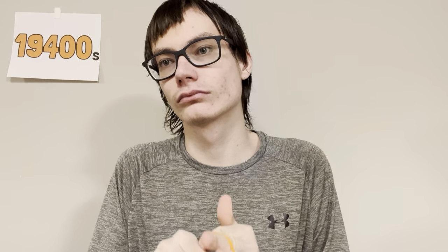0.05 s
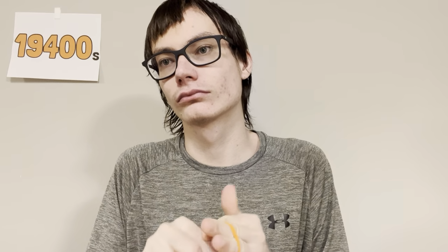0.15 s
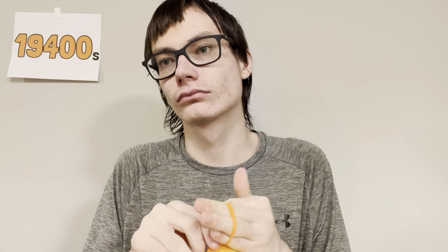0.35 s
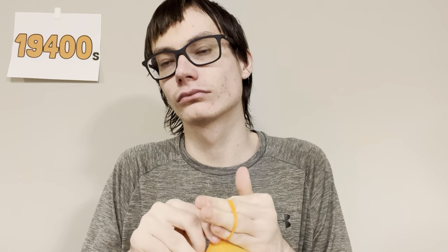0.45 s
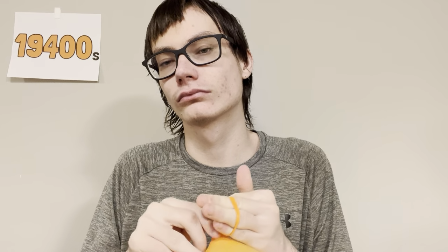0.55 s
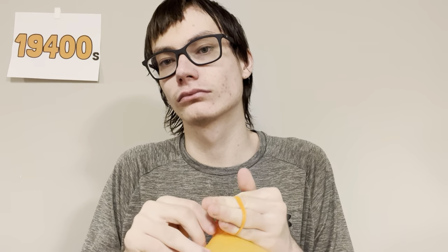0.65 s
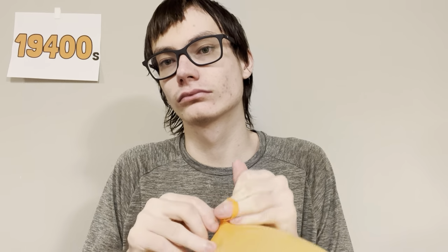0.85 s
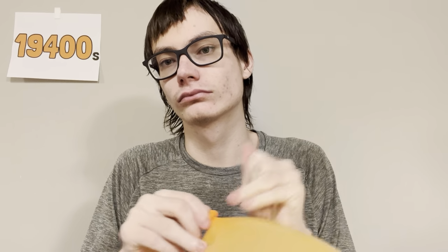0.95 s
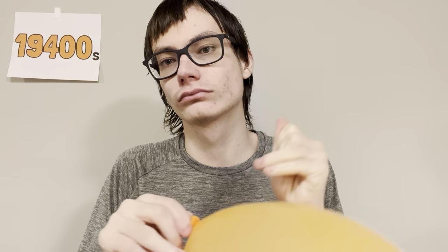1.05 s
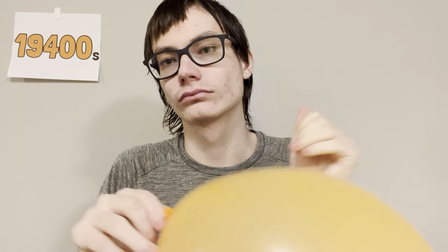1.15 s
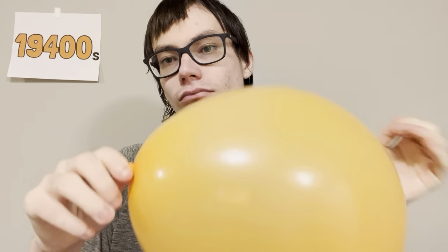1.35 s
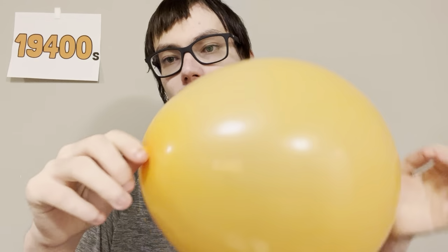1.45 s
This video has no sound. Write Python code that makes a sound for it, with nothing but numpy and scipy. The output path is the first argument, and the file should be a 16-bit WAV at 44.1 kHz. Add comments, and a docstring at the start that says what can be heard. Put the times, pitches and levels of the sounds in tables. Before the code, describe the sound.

Fingers rub a balloon while knotting it, and the rubber neck snaps free.

```python
"""A small, quiet room, a stereo microphone close to two hands as they finish knotting a balloon.
Fingertips stick and slip on the taut skin: it ticks, rubs and groans, and the held balloon rings.
The stretched neck slips off the fingers in a few bright snaps, and the freed balloon is bumped
softly as it is lifted. Faint mains hum and room rumble lie underneath."""
import sys
import numpy as np
from scipy import signal
from scipy.fft import rfft, irfft
from scipy.io import wavfile
from scipy.ndimage import uniform_filter1d

SR = 44100
rng = np.random.default_rng(int(sys.argv[2]) if len(sys.argv) > 2 else 0)


def transcribe(u):
    """Save the signal u as a 16-bit wav file named by the first command-line argument.

    u: samples, shape (n,) or (channels, n), limited to [-1, 1]; the rate is SR.
    q: integer samples, one column per channel.
    """
    v = np.clip(np.atleast_2d(u).T, -1, 1)
    q = np.round(v * 32767).astype(np.int16)
    wavfile.write(sys.argv[1], SR, q)


N = 66150
BAND_LIMIT_HZ = 16100

# The neck leaving the fingers. Each row: start in seconds, zip level in dB, crack level in dB.
NECK_SNAPS = [(.779, -26.5, -29), (.7822, -16, -14.5), (.8052, -7, -16.5), (.8068, -4, -16.5),
              (.8074, 3.5, -13.5), (.8087, -2, -13), (.8099, 0.5, -14.5), (.8158, 3.5, -11),
              (.8177, -4.5, -17.5), (.8255, -9, -16), (.8685, -7, -20), (.9107, -28.5, -13),
              (.9137, -3, -7), (.9515, -18, -10), (.9537, 1, 0.5), (.9552, -14.5, -14.5)]
# The thin zip and the broad crack. Each row: frequency in Hz, relative level in dB.
ZIP_COLOUR = [(100, -7), (1000, -8), (3500, -25.5), (5600, 6), (6800, 7), (8500, 7), (11000, -7.5),
              (15500, 2)]
CRACK_COLOUR = [(100, -1), (1000, 5.5), (2200, -2.5), (3200, -1.5), (5300, 5), (6500, 14.5), (9500, -3.5),
                (13000, -32), (16000, -12)]
def snaps(trail_db=-17, trail_decay_s=.00091, spread_s=.00054):
    """The stretched neck lets go: a zip and a crack, each trailed by tiny slips."""
    out = np.zeros(N)
    for k, colour in enumerate([ZIP_COLOUR, CRACK_COLOUR]):
        releases = [(start, levels_db[k]) for start, *levels_db in NECK_SNAPS]
        trail = amp(trail_db) * puffs(releases, trail_decay_s)
        out += coloured(clicks(releases) + trail, colour)
    # Stretched rubber carries the treble ahead of the bass.
    return shaped(out, lambda hz: np.exp(1j * np.pi * spread_s * hz * (hz / BAND_LIMIT_HZ - 1)))


# The neck dragging between snaps. Each row: start in seconds, length in seconds, level in dB.
NECK_DRAGS = [(0.802, .036, -20), (0.843, .04, -23.5), (0.903, .012, -26)]
# Its bright patter. Each row: frequency in Hz, relative level in dB.
DRAG_COLOUR = [(300, -12), (2500, 1.5), (4500, -8), (7000, -5.5), (9500, -2.5), (11500, -7), (15000, 2)]
def drags():
    """The stretched neck creeps over the fingers in separate tiny slips."""
    t = np.arange(N) / SR
    force = sum(amp(db) * ((t > start) & (t < start + length)) for start, length, db in NECK_DRAGS)
    return coloured(force * slips(per_s=1800, spread_db=3, max_db=6), DRAG_COLOUR)


# Single fingertip slips. Each row: start in seconds, level in dB, mean pitch in Hz.
FINGER_TICKS = [(0.204, -47, 1250), (.2240, -24, 1480), (0.2707, -23.5, 1483), (0.3, -24, 1484),
                (0.316, -34.5, 1180), (0.3544, -28.5, 1550), (0.3897, -22.5, 1367), (0.405, -30, 1368),
                (0.427, -48, 2570), (0.4896, -30, 1270), (0.591, -27, 1080), (0.6036, -35.5, 897),
                (.630, -32.5, 1030), (0.67, -25.5, 983), (0.7123, -30.5, 900), (0.9138, -26, 1683),
                (.9235, -36.5, 1140), (0.9586, -23, 1417), (0.967, -25, 1520)]
# The opening click and the hollow air inside. Each row: frequency in Hz, relative level in dB.
CLICK_COLOUR = [(60, -16.5), (250, 19.5), (600, 3.5), (2300, -17), (3400, -1.5), (7000, 1), (15000, -35)]
HOLLOW_COLOUR = [(60, -18), (150, -14), (300, 0), (500, 4.5), (750, -0.5), (1400, -9), (2400, -9),
                 (4000, -42)]
def ticks(rise_s=.00026, sag_s=.0018, sag_to=.33, grit_db=-43.5, click_db=-6.5, hollow_db=-15.5):
    """A fingertip lets go: a click, a pitch that sags as the skin relaxes, and the air inside answers."""
    t, out = np.arange(SR // 50) / SR, np.zeros(N)
    envelope = swell(t, rise_s, end_s=rise_s, fall_s=.001)
    sag = sag_to + (1 - sag_to) * np.exp(-t / sag_s)
    sag /= np.average(sag, weights=envelope ** 2)
    for start, db, hz in FINGER_TICKS:
        skin = np.sin(2 * np.pi * np.cumsum(hz * sag) / SR)
        grit = amp(grit_db) * rng.standard_normal(len(t))
        add(out, start, amp(db) * envelope * (skin + grit))
    onsets = [(start, db) for start, db, _ in FINGER_TICKS]
    click = amp(click_db) * coloured(clicks(onsets), CLICK_COLOUR)
    hollow = amp(hollow_db) * coloured(puffs(onsets, decay_s=.014), HOLLOW_COLOUR)
    return out + click + hollow


# Fingers on rubber. Each row: start and length in seconds, then body, hiss and push levels in dB.
FINGER_RUBS = [(0, 0.16, -62.5, -54, -102), (0.026, 0.011, -56, -56.5, -92),
               (0.1105, 0.03, -48, -42.5, -60), (0.177, 0.099, -65, -58.5, -59.5),
               (0.284, 0.053, -49, -59.5, -50.5), (0.355, 0.037, -49, -58.5, -54),
               (0.392, 0.053, -42, -56.5, -46.5), (0.484, 0.045, -43.5, -59.5, -49.5),
               (0.516, 0.013, -41, -44.5, -56), (0.53, 0.01, -42.5, -38, -60.5),
               (0.555, 0.032, -51, -50, -52), (0.585, 0.035, -37.5, -38.5, -50),
               (0.612, 0.054, -38.5, -46.5, -40.5), (0.665, 0.019, -37, -54, -35.5),
               (0.686, 0.05, -41, -45, -59), (0.75, 0.14, -46, -48.5, -71), (0.813, 0.039, -38, -38, -42.5),
               (0.836, 0.029, -49.5, -42.5, -48.5), (0.883, 0.016, -42, -41, -55.5),
               (0.913, 0.026, -38, -38.5, -38.5), (0.943, .016, -40.5, -41, -41.5),
               (0.992, 0.026, -48, -52.5, -51), (1.176, 0.022, -69, -64, -54.5),
               (1.252, 0.0041, -54.5, -59.5, -53.5), (1.267, 0.031, -76, -62, -60),
               (1.329, 0.023, -66, -63, -63)]
# The three parts of a rub. Each row: frequency in Hz, relative level in dB.
BODY_COLOUR = [(80, -23), (250, -4), (420, 3.5), (700, 4), (1000, 0.5), (1400, 0), (2100, -17),
               (3200, -19.5), (6000, -48.5)]
HISS_COLOUR = [(300, -37.5), (1200, 9), (2600, 4.5), (4000, -2), (5600, 3.5), (7000, 0.5), (9000, 0),
               (11000, -41.5), (15000, -4)]
PUSH_COLOUR = [(20, -40), (45, -5), (115, 8.5), (170, 1.5), (230, 1), (310, -3), (700, -26), (2000, -61.5)]
def rubs():
    """Each stroke drives the skin with dense slips: a hollow body, a hiss and a low push."""
    t, power = np.arange(N) / SR, np.zeros((3, N))
    for start, length, *levels_db in FINGER_RUBS:
        stroke = swell(t - start, rise_s=.0032, end_s=length, fall_s=.0062)
        power += (amp(levels_db)[:, None] * stroke) ** 2
    body, hiss, push = np.sqrt(power)
    fine_friction = unit_rms(steady_slips() + rng.standard_normal(N))
    return (coloured(body * steady_slips(), BODY_COLOUR)
            + coloured(hiss * fine_friction, HISS_COLOUR)
            + coloured(push * steady_slips(), PUSH_COLOUR))


# The skin catching under a finger. Each row: start and length in seconds, pitch in Hz, level in dB.
SKIN_GROANS = [(.42, .03, 453, -41), (.516, 0.038, 699, -40), (.52, 0.011, 1353, -40),
               (0.586, 0.016, 641.6, -32.5), (0.611, 0.049, 355, -41.5), (0.67, 0.041, 370, -37.5),
               (0.707, .03, 724, -36.5), (.813, 0.038, 360.6, -39.5), (.82, .03, 691.4, -34.5),
               (.85, 0.028, 833, -38.5), (.862, 0.017, 452, -44.5), (.919, 0.015, 513, -33.5),
               (.938, 0.019, 467.3, -30.5), (.951, 0.019, 1174, -29.5)]
def groans(glide_per_s=1.84, waver_depth=.07, flutter_depth=.4):
    """Slips lock onto one mode of the skin: a rough, wavering note that climbs as the skin is pulled."""
    t, out = np.arange(SR // 10) / SR, np.zeros(N)
    for start, length, hz, db in SKIN_GROANS:
        waver, flutter = unit_rms(uniform_filter1d(rng.standard_normal((2, len(t))), size=200))
        pitch = hz * (1 + glide_per_s * (t - length / 2) + waver_depth * waver)
        envelope = swell(t, rise_s=.008, end_s=length, fall_s=.0043)
        note = np.sin(2 * np.pi * (np.cumsum(pitch) / SR + rng.random()))
        add(out, start, amp(db) * envelope * (1 + flutter_depth * flutter) * note)
    return out


# The held balloon's modes. Each row: untuned frequency in Hz, gain in dB, 60 dB decay in seconds.
HELD_MODES = [(387.4, -45.5, .08), (451, -49.5, 0.099), (478, -59, .07), (643, -50, 0.18),
              (721.5, -54.5, 0.19), (842, -51.5, 0.066), (1164, -67.5, 0.24), (1415, -51, 0.078),
              (1890, -74.5, 0.13)]
# How the grip tunes them. Each row: time in seconds, pitch ratio.
GRIP_TUNING = [(.2, 1.01), (.47, 0.89), (.6, 0.97), (.72, 1.01), (.82, .96), (.95, 1.14), (1.1, 1.05)]
def held_ring(touch):
    """Each touch rings the held balloon, whose modes shift as the grip changes."""
    tuning = np.interp(np.arange(N) / SR, *np.transpose(GRIP_TUNING))
    tuned_time = np.cumsum(tuning) / SR
    out = np.zeros(N)
    for hz, db, t60 in HELD_MODES:
        phasor = np.exp(2j * np.pi * hz * tuned_time)
        mode = phasor * decaying(touch / phasor, t60 / np.log(1000))
        out += amp(db) * mode.real
    return out


# The hand bumping the freed balloon. Each row: start in seconds, level in dB.
HAND_BUMPS = [(1.193, -45.5), (1.2215, -34), (1.2465, -46), (1.267, -44)]
# The free balloon's modes. Each row: frequency in Hz, relative level in dB, 60 dB decay in seconds.
FREE_MODES = [(64, -9, .18), (345, -12, .08), (398, 1.5, .105), (576, -18, .08), (854, -9, .12),
              (974, -19, .11)]
# The pat of the hand itself. Each row: frequency in Hz, relative level in dB.
PAT_COLOUR = [(100, -8), (400, 10.5), (1000, 3), (1900, -10), (3000, -20), (8000, -19), (15000, -18.5)]
def bumps(rise_s=.006, pat_db=-8):
    """Soft pats of the hand make the free balloon ring."""
    t = np.arange(SR // 2) / SR
    ring = sum(amp(db) * np.exp(-np.log(1000) * t / t60) * np.sin(2 * np.pi * hz * t)
               for hz, db, t60 in FREE_MODES)
    ring *= np.minimum(t / rise_s, 1)
    pats = amp(pat_db) * coloured(puffs(HAND_BUMPS, decay_s=.012), PAT_COLOUR)
    return signal.fftconvolve(clicks(HAND_BUMPS), ring)[:N] + pats


# Faint, dry contacts. Each row: start in seconds, level in dB.
DRY_CRACKLES = [(.1215, -24), (.3555, -29), (.4055, -25), (.4255, -27.5), (.4895, -26.5), (1.182, -35.5),
                (1.2545, -25.5), (1.257, -29.5), (1.33, -33.5), (1.339, -37.5), (1.351, -39.5)]
# Their grit. Each row: frequency in Hz, relative level in dB.
CRACKLE_COLOUR = [(500, -2.5), (2500, -8), (4500, 3), (8000, -0.5), (11000, -16), (15000, -9.5)]
def crackles(decay_s=.0013):
    """Fingers brush the rubber in soft, gritty puffs."""
    to_unit_energy = np.sqrt(2 / (decay_s * SR))
    return coloured(puffs(DRY_CRACKLES, decay_s) * to_unit_energy, CRACKLE_COLOUR)


# Surfaces near the hands. Each row: delay in seconds, gain in dB.
NEAR_ECHOES = [(.0047, -15.5), (.0071, -25.5), (.0113, -34), (.0139, -15)]
# What they send back. Each row: frequency in Hz, further gain in dB.
ECHO_COLOUR = [(100, -5), (1500, -16.5), (4000, -4.5), (15000, 0)]
def echoes(sound):
    """Nearby surfaces return a few thin, early reflections."""
    reflections = signal.fftconvolve(sound, clicks(NEAR_ECHOES))[:N]
    return shaped(reflections, lambda hz: amp(curve_at(ECHO_COLOUR, hz)))


# The room's decay. Each row: frequency in Hz, 60 dB decay in seconds.
ROOM_T60 = [(120, 0.64), (400, 0.41), (1100, 0.39), (3000, 0.43), (7000, 0.57), (15000, 0.83)]
# Its strength. Each row: frequency in Hz, gain in dB.
ROOM_GAIN = [(100, -6.5), (200, -2.5), (330, -1.5), (480, -5.5), (800, 4), (1300, -2), (3000, 1.5),
             (6000, -9), (8000, -13.5), (10000, -22.5), (15000, -19.5)]
# Its likeness at the two microphone ports. Each row: frequency in Hz, left-right correlation.
ROOM_LIKENESS = [(50, 0.7), (200, 0.75), (500, 0.15), (1200, 0), (4000, 0)]
def room(sound, onset_s=.0033):
    """The small room's diffuse tail dies band by band, alike on both sides in the bass."""
    hz, t, (left, other) = signal.stft(rng.standard_normal((2, SR)), SR, nperseg=256)
    likeness = curve_at(ROOM_LIKENESS, hz)[:, None]
    right = likeness * left + np.sqrt(1 - likeness ** 2) * other
    decay_per_s = np.log(1000) / curve_at(ROOM_T60, hz)[:, None]
    gain = np.sqrt(2 * decay_per_s / SR) * amp(curve_at(ROOM_GAIN, hz))[:, None]
    bands = np.array([left, right]) * gain * np.exp(-decay_per_s * t)
    tail = signal.istft(bands, SR, nperseg=256)[1]
    tail *= np.minimum(np.arange(tail.shape[1]) / SR / onset_s, 1)
    return signal.fftconvolve(sound[None], tail, axes=1)[:, :N]


# The mains tone and its octave. Each row: frequency in Hz, rms level in dB.
HUM_PARTIALS = [(59.2, -64), (118.4, -66)]
def mains_hum():
    """The mains hums faintly on two steady sines."""
    t = np.arange(N) / SR
    return sum(np.sqrt(2) * amp(db) * np.sin(2 * np.pi * (hz * t + rng.random()))
               for hz, db in HUM_PARTIALS)


# The quiet room's air. Each row: frequency in Hz, relative level in dB.
RUMBLE_COLOUR = [(20, -6), (70, 16), (200, -33), (450, -11), (1000, -15), (8000, -27.5), (16000, -65.5)]
def rumble(level_db=-61):
    """Low room noise, mostly shared by left and right."""
    shared, left, right = (coloured(rng.standard_normal(N), RUMBLE_COLOUR) for _ in range(3))
    return amp(level_db) * unit_rms(shared + .5 * np.array([left, right]))


def slips(per_s, spread_db, max_db):
    """Stick-slip friction: randomly timed clicks of uneven size."""
    size = amp(np.minimum(spread_db * rng.exponential(1, N), max_db))
    return size * rng.choice([-1, 1], N) * (rng.random(N) < per_s / SR)


def steady_slips():
    """Dense slips held to a steady mean strength."""
    train = slips(per_s=2200, spread_db=2, max_db=6)
    local_power = abs(uniform_filter1d(train ** 2, size=700))
    return unit_rms(train / np.sqrt(local_power + 1e-6))


def clicks(rows):
    """One impulse for each row of start in seconds and level in dB."""
    out = np.zeros(N)
    for start, db in rows:
        out[round(start * SR)] += amp(db)
    return out


def puffs(rows, decay_s):
    """A dying puff of noise for each row of start in seconds and level in dB."""
    return decaying(clicks(rows), decay_s) * rng.standard_normal(N)


def decaying(x, decay_s):
    """Gives every sample an exponential tail."""
    return signal.lfilter([1], [1, -np.exp(-1 / (decay_s * SR))], x)


def swell(t, rise_s, end_s, fall_s):
    """An envelope that rises, holds until end_s and dies away."""
    return np.clip(t / rise_s, 0, 1) * np.exp(-np.maximum(t - end_s, 0) / fall_s)


def coloured(x, colour, size=4096):
    """Applies a minimum-phase filter of energy 1 with the given spectrum."""
    hz = abs(np.fft.fftfreq(size, 1 / SR))
    log_gain = np.log(amp(curve_at(colour, hz)))
    spectrum = np.exp(signal.hilbert(log_gain).conj())
    taps = np.fft.ifft(spectrum).real[:size // 2]
    return signal.fftconvolve(x, taps / np.linalg.norm(taps))[:N]


def shaped(x, gain):
    """Applies a gain that is a function of frequency."""
    return irfft(rfft(x, 2 * N) * gain(np.fft.rfftfreq(2 * N, 1 / SR)))[..., :N]


def curve_at(points, hz):
    """Joins rows of frequency and value on a log-frequency axis."""
    point_hz, values = np.transpose(points)
    return np.interp(np.log(hz + 1), np.log(point_hz + 1), values)


def amp(db):
    """Decibels to gain."""
    return 10 ** (np.asarray(db) / 20)


def unit_rms(x):
    """Scales to rms 1."""
    return x / np.sqrt(np.mean(x ** 2) + 1e-20)


def add(mix, start_s, sound):
    """Mixes a sound in at start_s."""
    part = mix[round(start_s * SR):][:len(sound)]
    part += sound[:len(part)]


# Phase between the microphone's two ports. Each row: frequency in Hz, left's lead in radians.
PORT_PHASE = [(30, 1), (400, 0.81), (1500, 0.6), (3000, -1.5), (4500, -1.5), (7000, -5), (8500, -4),
              (10500, -4), (12500, -2), (15500, -3)]
# Their balance. Each row: frequency in Hz, left minus right in dB.
PORT_BALANCE = [(60, -2.5), (150, -3), (400, -5), (1200, -2.5), (2500, -2), (6000, -3), (15000, 2.5)]
def scene():
    """The balloon reaches the microphone's two ports from close by and through the room."""
    touch = ticks() + rubs() + snaps() + drags() + crackles()
    balloon = touch + held_ring(touch) + groans() + bumps()
    sides = np.array([[.5], [-.5]])
    near = shaped(balloon + echoes(balloon), lambda hz: np.exp(1j * sides * curve_at(PORT_PHASE, hz)))
    mix = near + room(balloon) + mains_hum() + rumble()
    return shaped(mix, lambda hz: amp(sides * curve_at(PORT_BALANCE, hz)))


def record(dry, split_hz=200, threshold_db=-58, slope=.87, max_cut_db=12.5):
    """The recorder's gentle expander lowers quiet passages above the bass; then the band limit."""
    upper = signal.sosfiltfilt(signal.butter(2, split_hz, "high", fs=SR, output="sos"), dry)
    power = abs(uniform_filter1d((upper ** 2).mean(0), size=1500))
    level_db = 10 * np.log10(power + 1e-14)
    cut_db = np.clip((threshold_db - level_db) * slope, 0, max_cut_db)
    expanded = dry - upper + upper * amp(-cut_db)
    lowpass = signal.firwin(255, BAND_LIMIT_HZ, window=("kaiser", 9), fs=SR)
    return signal.oaconvolve(expanded, lowpass[None], "same")


dry = scene()
out = record(dry)
transcribe(out)
```